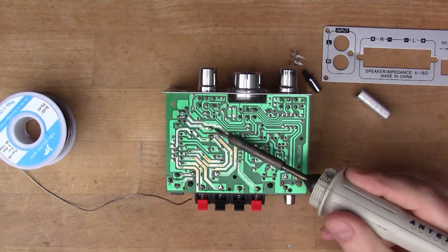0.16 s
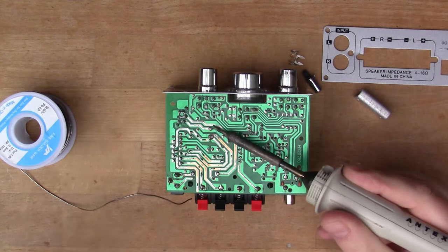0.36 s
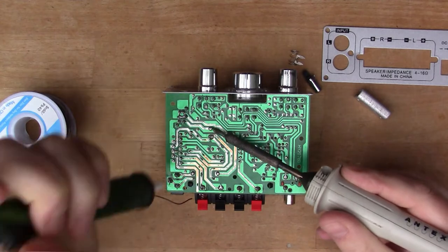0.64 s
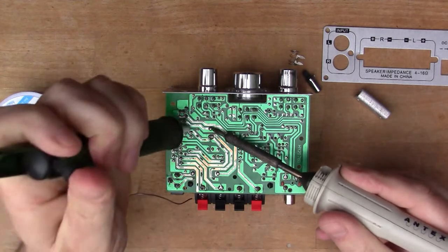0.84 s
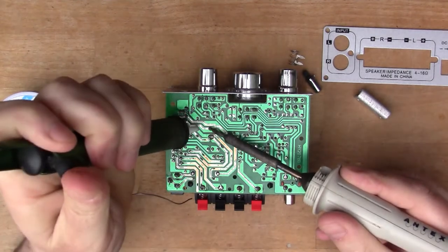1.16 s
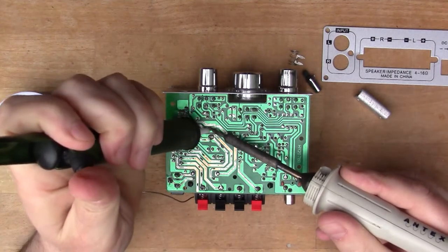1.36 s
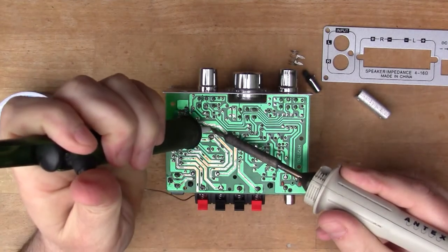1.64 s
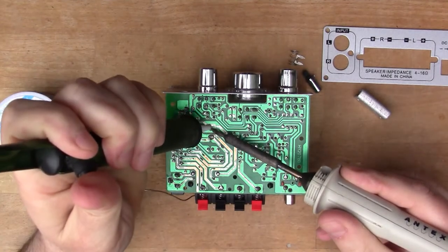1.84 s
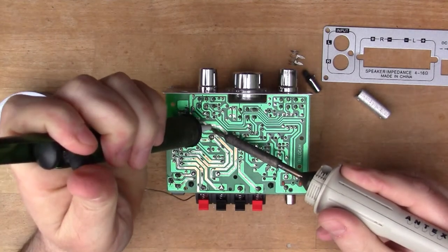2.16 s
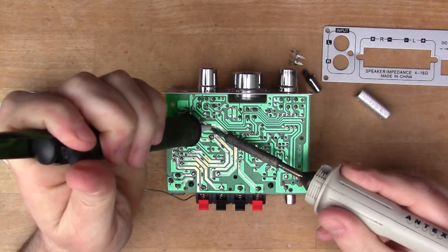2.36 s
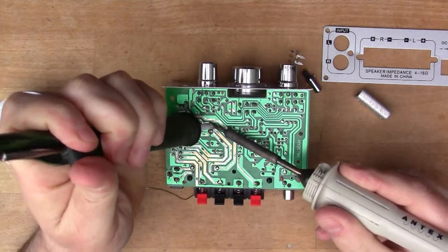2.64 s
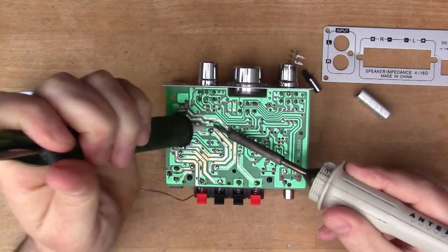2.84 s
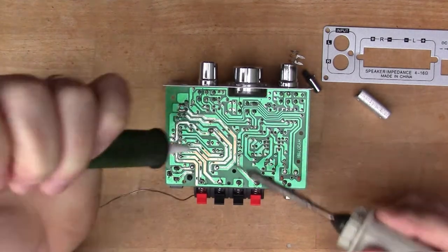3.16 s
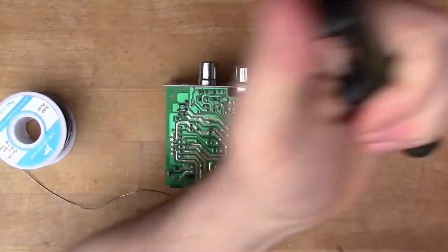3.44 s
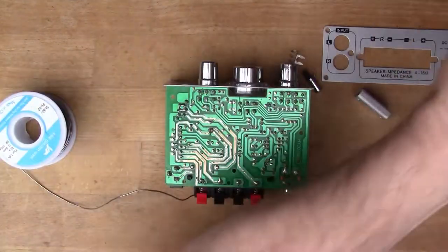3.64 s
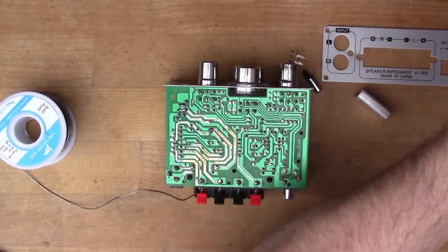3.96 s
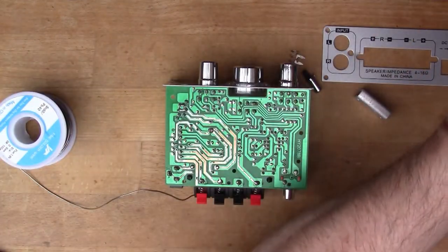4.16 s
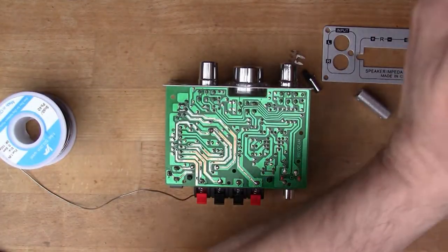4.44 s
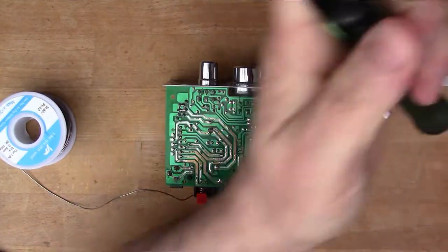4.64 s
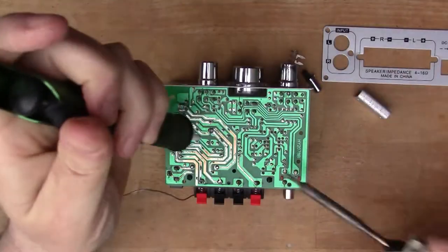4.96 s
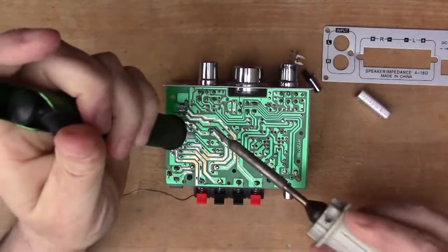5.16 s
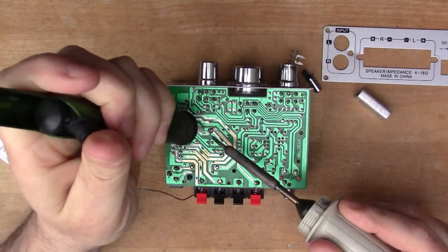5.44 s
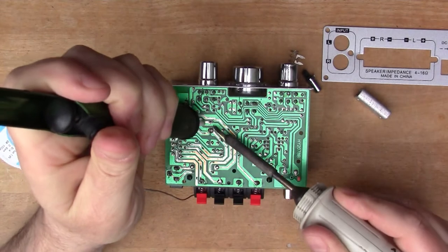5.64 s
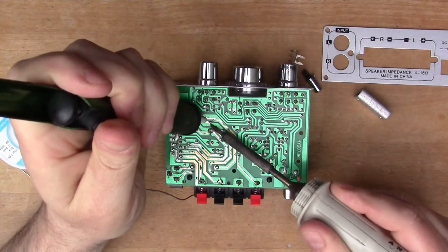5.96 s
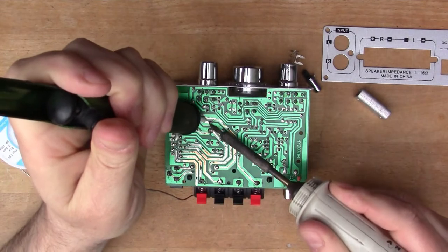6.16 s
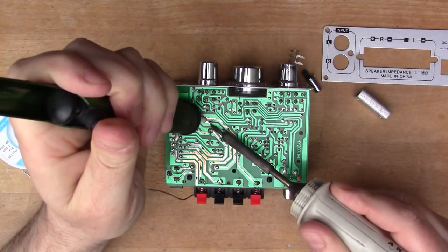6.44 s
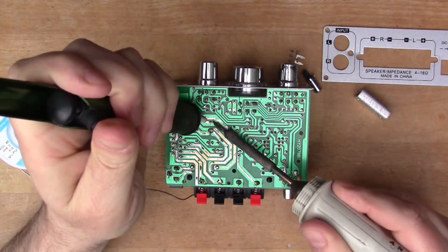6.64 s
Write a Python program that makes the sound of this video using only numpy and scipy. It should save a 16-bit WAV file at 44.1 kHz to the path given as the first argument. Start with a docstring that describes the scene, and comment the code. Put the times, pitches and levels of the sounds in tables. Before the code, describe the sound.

Close at a wooden bench in a small dry room, a plunger catch clicks sharply at once, then a soldering iron lightly taps a circuit board. A desoldering pump fires with a loud rattling snap. Hands rub, the pump is pushed down with an airy scrape and clicks locked, a hot tip briefly sizzles, the nozzle clatters softly onto the board and the iron taps again. Faint mains hum and hiss continue underneath.

```python
"""Spring-loaded desoldering pump at a wooden bench

In a small room the pump is cocked, fired once with a loud rattling snap, cocked again and set down on the
circuit board; an iron taps the board early and late. Contacts are bursts of shaped noise that excite decaying
modes; rubbing, suction and sizzling are grainy noise; the strokes add a falling whistle and rising resonances.
Under it lie a mains hum, faint whines, a low room rumble and faint hiss."""
import sys
import numpy as np
from scipy import signal
from scipy.fft import rfft, irfft
from scipy.io import wavfile
from scipy.ndimage import uniform_filter1d

SR = 44100
rng = np.random.default_rng(int(sys.argv[2]) if len(sys.argv) > 2 else 0)


def materialize(psi):
    """Save the field psi as 16-bit PCM at rate SR to the path in sys.argv[1].

    A 1-D psi becomes a single channel; in a 2-D psi each row is a channel.
    """
    bounded = np.clip(np.atleast_2d(psi).T, -1, 1)
    quanta = np.round(bounded * 32767).astype(np.int16)
    wavfile.write(sys.argv[1], SR, quanta)


N = 299880

# Every contact has a body below SPLIT_HZ and an edge above it; levels are relative within a kind of contact.
SPLIT_HZ = 2500

# spectrum of the still room: f/Hz, relative level/dB per Hz
FLOOR_SPECTRUM = [(10, 2.5), (20, 1.5), (30, -7.5), (45, -5), (65, -15.5), (85, -26), (150, -23),
                  (240, -25), (350, -31), (520, -30.5), (800, -36), (1400, -44), (3000, -54.5),
                  (9000, -57.5), (16000, -63)]
# left-right likeness of the room noise: f/Hz, likeness/(0 to 1)
LIKENESS = [(30, 0.92), (100, 0.7), (250, 0.87), (600, 0.87), (1500, 0.2), (4000, 0.05), (16000, 0.2)]
# upper lines of the mains hum and faint whines: f/Hz, level/dB
HUM_LINES = [(238, -57), (286, -60.5), (490, -63.5), (780, -67), (1464, -89.5), (1631, -100.5),
             (1997, -80.5), (9523, -78.5)]
# lowest line of the hum: t/s, relative level/dB
HUM_SWELL = [(0, -55), (1.8, -54.5), (2.25, -48), (2.9, -48.5), (3.7, -52), (6.8, -49)]
HUM_HZ = 118.8
# reverberation time of the room: f/Hz, t60/s
ROOM_T60 = [(100, 0.16), (350, 0.21), (800, 0.13), (1600, 0.26), (4000, 0.22), (8000, 0.31), (15000, 0.19)]

# soft low thumps: the hand on the bench, and at 0.083 s the first catch dropping in: t/s, body level/dB, edge
# level/dB
BUMPS = [(0.083, -32, -70), (2.845, -63, -64), (3.014, -39, -64.5), (3.835, -41, -74)]
# spectrum of a bump: f/Hz, relative level/dB per Hz
BUMP_COLOUR = [(50, -72), (100, 2.5), (200, -5.5), (450, -4.5), (800, -22.5), (2000, -29), (16000, -52)]
# hands and sleeves rub as the grip changes: start t/s, end t/s, level/dB
RUBS = [(0, 0.054, -43.5), (0.375, 0.53, -55), (0.75, 1.018, -63), (3.13, 3.636, -57.5),
        (3.648, 3.746, -53), (4.32, 4.655, -61.5), (4.845, 5.207, -55.5), (5.364, 5.4, -57.5),
        (6.64, 6.663, -55.5)]
# spectrum of the rubbing: f/Hz, relative level/dB per Hz
HANDLING_COLOUR = [(275, 3.5), (500, -23.5), (900, 7.5), (1300, -5), (2000, -6.5), (3000, -6.5),
                   (5000, -9.5), (9000, -10.5), (15300, -16.5)]
# the hot tip sizzles briefly as it is wiped: start t/s, end t/s, level before cooling/dB
SIZZLE = (4.5, 4.575, -43)
# spectrum of the sizzle: f/Hz, relative level/dB per Hz
SIZZLE_COLOUR = [(385, -28), (700, -8), (1300, -4), (2200, 1.5), (3300, -5), (5500, -1), (9500, -2.5),
                 (13000, -3.5), (15300, -6)]

# the iron taps the board: t/s, body level/dB, edge level/dB, relative ring level/dB
TAPS = [(0.385, -28, -52, -12), (0.974, -54, -60, 8), (1.382, -44.5, -58, 2), (1.765, -42, -58, -8),
        (5.890, -25, -54.5, -6.5), (6.5665, -32, -52, 9), (6.6725, -19.5, -41.5, -4)]
# spectrum of a tap: f/Hz, relative level/dB per Hz
TAP_COLOUR = [(190, -51), (350, -11), (650, -11.5), (880, -6.5), (1100, 2.5), (1350, -3.5), (1620, -3.5),
              (1950, -20), (2400, -14.5), (2800, -6), (4000, -5), (5500, -12.5), (8500, -21), (11500, -8.5),
              (15300, -25)]
# mode clusters of the tapped board: f/Hz, half width/Hz, relative level/dB, t60/s
BOARD_MODES = [(805, 21, -11.5, 0.36), (1027, 28, -4, 0.1), (1210, 16, -8, 0.07), (1485, 22, -5, 0.041),
               (1660, 19.4, -4, 0.13), (4170, 180, -29, 0.098)]
# the nozzle is set down and shifted on the board: t/s, body level/dB, edge level/dB, relative ring level/dB
NOZZLE = [(4.844, -55, -68, -6), (4.872, -49, -66, -8), (4.9105, -26.5, -29.5, 4), (4.9165, -32.5, -50, -4),
          (4.951, -45, -61, -5), (4.967, -39, -62, -4), (4.994, -49, -66, -12), (5.025, -45.5, -65, -6),
          (5.083, -35.5, -44.5, -16), (5.16, -41, -48.5, -12), (5.174, -39.5, -51, -10),
          (5.197, -41.5, -57, -6), (5.267, -46.5, -60, -11), (5.361, -48, -68, -12),
          (5.371, -53, -47.5, -13.5), (5.435, -53, -64, -9.5)]
# spectrum of a nozzle contact: f/Hz, relative level/dB per Hz
NOZZLE_COLOUR = [(137, -22), (250, -11), (480, 1.5), (700, -12.5), (1000, 0.5), (1700, -3.5), (2050, -5),
                 (2450, -5), (3200, 3), (4500, 2.5), (7000, 0), (10800, 3), (13000, -5), (15300, -13)]
# mode clusters of the board under the nozzle: f/Hz, half width/Hz, relative level/dB, t60/s
SEAT_MODES = [(495, 19, -16, 0.1), (1180, 70, -16, 0.08), (1680, 97, -8, 0.05), (2420, 190, 1.5, 0.031),
              (2490, 410, -16, 0.089)]

# light ticks of the pump in the hand, and at 4.564 s a crackling pop of the sizzle: t/s, body level/dB, edge
# level/dB
TICKS = [(2.8934, -39.5, -43), (3.4235, -37, -59), (3.6536, -35.5, -50), (4.3236, -39.5, -71),
         (4.564, -33.5, -66), (4.6297, -44, -76)]
# spectrum of a tick: f/Hz, relative level/dB per Hz
TICK_COLOUR = [(400, -9), (900, -4), (2000, -6), (3200, 2), (4400, 10), (6000, 1.5), (8000, -5),
               (11000, -11), (16000, -26)]
# the plunger rod knocks in the barrel: t/s, body level/dB, edge level/dB, relative ring level/dB
ROD = [(0.2385, -25.5, -25, -4.5), (4.029, -24.5, -46, -5.5), (4.2153, -25, -24.5, -0.5)]
# spectrum of a rod knock: f/Hz, relative level/dB per Hz
ROD_COLOUR = [(165, -11.5), (300, -12.5), (500, -16.5), (700, -7.5), (950, -11), (1350, -15), (1800, -20),
              (2700, -9.5), (3700, -2.5), (5600, -8.5), (8000, -6), (10000, -4), (13000, -10),
              (15300, -20.5)]
# mode clusters of the barrel: f/Hz, half width/Hz, relative level/dB, t60/s
BARREL_MODES = [(700, 13, -0.5, 0.025), (772, 77, -23, 0.062), (1670, 40, -14, 0.033),
                (2073, 27, -11.5, 0.02), (3800, 220, -10, 0.038)]

# the plunger is pushed home and the catch drops in:
# catch t/s, body level/dB, edge level/dB, most shaken spring region f/Hz, push level/dB
COCKINGS = [(0.083, -17.5, -14, 4870, -59), (4.0507, -15, -11, 3560, -44.5)]
# spectrum of the sliding seal and of the suction: f/Hz, relative level/dB per Hz
SEAL_COLOUR = [(154, 2.5), (280, -17), (600, -6), (1000, 7), (1700, 7), (2600, 0), (3700, 3.5), (5500, 1),
               (7500, 0.5), (9300, 2), (11000, -1), (13000, -5.5), (15300, -17)]
# resonances of the shrinking air chamber: multiple of the air resonance, half width/Hz, relative level/dB
CHAMBER = [(0.075, 200, -5.5), (.17, 350, -6.5), (0.521, 330, -9), (0.999, 1400, 3)]
# squeak of the seal in the first stroke: start t/s, end t/s, f/Hz
SQUEAK = (0.013, 0.026, 1340)
# spectrum of the catch: f/Hz, relative level/dB per Hz
LATCH_COLOUR = [(82, -38.5), (150, -7.5), (450, -26), (720, -8), (1350, -20), (2100, -19.5), (3050, -5),
                (3650, -16), (4400, -9), (5500, 9), (8500, -1), (10500, 6.5), (12200, -2.5), (15300, 0)]
# mode clusters of the spring: f/Hz, half width/Hz, relative level/dB, t60/s
SPRING_MODES = [(2580, 510, -16.5, 0.11), (3600, 200, -20, 0.053), (3690, 330, -17, 0.092),
                (4400, 490, -19, 0.12), (5140, 210, -17.5, 0.066), (6500, 1300, -18, 0.096),
                (8430, 1100, -17, 0.13), (10700, 630, -24, 0.18)]

# the freed piston knocks, hits its stop and rebounds: t/s, body level/dB, edge level/dB
PISTON = [(2.6238, -8.5, -15), (2.6295, -12.5, -18.5), (2.6355, -9.5, -6.5), (2.645, -18, -18),
          (2.652, -8, -14.5), (2.661, -8, -15), (2.672, -9, -15), (2.678, -15, -19), (2.687, -20, -22),
          (2.6995, -16, -27), (2.709, -21, -28), (2.721, -26, -32)]
# spectrum of the snap: f/Hz, relative level/dB per Hz
SNAP_COLOUR = [(41, -5.5), (75, -18.5), (110, -15.5), (160, -5), (240, -9), (310, -1), (390, -6.5),
               (560, -3), (820, -1), (1150, -2), (1700, -1.5), (3000, -6), (4300, -8.5), (5600, -6.5),
               (7200, -13.5), (11000, -12.5), (15300, -22)]
# mode clusters of the struck stop: f/Hz, half width/Hz, relative level/dB, t60/s
STOP_MODES = [(113.5, 9, -16.5, 0.17), (229, 12, -9.5, 0.099), (414, 8.5, -18, .12), (476, 14, -15.5, 0.11),
              (750, 4.1, -13, 0.1), (812, 10, -9.5, 0.097), (954, 11, -17, 0.11), (1312, 34, -18.5, 0.12),
              (1442, 10, -17.5, 0.075), (1670, 6.8, -14.5, 0.1), (2056, 25, -15, 0.11),
              (2498, 53, -19, 0.075), (5600, 220, -11.5, 0.13)]

# the stroke starts STROKE_S before the catch; its sound starts to ease off EASE_S before it
STROKE_S, EASE_S = 0.215, 0.043
# over one stroke the whistle falls and the air resonance rises fast, then levels off
WHISTLE_HZ, WHISTLE_FALL_HZ, AIR_HZ, AIR_RISE_HZ = 4220, 1390, 7760, 2700
# shares of the stroke: span of the rise, strongest point of the air, centre and span of the whistle
AIR_RISE_SPAN, AIR_AT, WHISTLE_AT, WHISTLE_SPAN = 0.16, 0.14, 0.38, 0.26
# level changes: seal over the stroke; air resonance per stroke away from AIR_AT; chamber over the stroke
SEAL_SAG_DB, AIR_SAG_DB, CHAMBER_GROWTH_DB = 3.5, 36.5, 4


def from_db(db):
    """Level definition: convert decibels to an amplitude ratio."""
    return 10 ** (np.asarray(db) / 20)


def rms_one(x):
    """Normalisation: scale to unit rms amplitude."""
    return x / np.sqrt(np.mean(x ** 2) + 1e-20)


def at_hz(points, hz):
    """Interpolation of a spectrum along a logarithmic frequency axis."""
    f, value = np.transpose(points)
    return np.interp(np.log(np.maximum(hz, 1)), np.log(f), value)


def butter(x, hz, kind, order=2):
    """Causal filtering with a Butterworth response."""
    return signal.sosfilt(signal.butter(order, hz, kind, fs=SR, output="sos"), x)


def convolve(x, response):
    """Linear superposition: convolve a signal with an impulse response."""
    return signal.fftconvolve(np.atleast_2d(x), np.atleast_2d(response), axes=-1)[:, :N]


def balance(x, left_db):
    """Interchannel level difference: raise left against right by left_db."""
    return x * from_db([[left_db / 2], [-left_db / 2]])


def impulse(colour, size=4096):
    """Minimum phase: fold the cepstrum of a spectrum into a causal response of unit energy."""
    cepstrum = irfft(np.log(from_db(at_hz(colour, np.fft.rfftfreq(size, 1 / SR)))))
    cepstrum[1:size // 2] *= 2
    cepstrum[size // 2 + 1:] = 0
    response = irfft(np.exp(rfft(cepstrum)))
    return response / np.linalg.norm(response)


def at_ports(alike, size=N, bass_hz=1100):
    """Spatial coherence: stereo noise nearly common at long waves, its shared part reaching the left first."""
    hz = np.fft.rfftfreq(size, 1 / SR)
    apart = (1 - np.clip(alike, 0, 1)) * (.03 + .97 * hz ** 2 / (hz ** 2 + bass_hz ** 2))
    shared, own = rng.standard_normal(size), rng.standard_normal((2, size))
    delayed = np.roll(shared, 6)   # samples
    spectrum = np.sqrt(1 - apart) * rfft([shared, delayed]) + np.sqrt(apart) * rfft(own)
    return irfft(spectrum, size)


def bell(f, hz, width_hz):
    """Resonance curve of Gaussian form."""
    return np.exp(-.5 * ((f - hz) / width_hz) ** 2)


def narrow_noise(hz, width_hz, size=N):
    """Band-limited randomness: noise under a Gaussian resonance curve, unit rms."""
    spectrum = rfft(rng.standard_normal(size)) * bell(np.fft.rfftfreq(size, 1 / SR), hz, width_hz)
    return rms_one(irfft(spectrum, size))


def hum_line(hz, waver, width_hz):
    """Modulation by narrow-band noise: a tone wavering in level and phase, unit rms."""
    tone = np.sin(2 * np.pi * hz * np.arange(N) / SR)
    return rms_one(tone + waver * narrow_noise(hz, width_hz))


def glide(hz, width_hz):
    """Frequency modulation: stereo noise in a resonance that follows a pitch curve."""
    carrier = np.sin(2 * np.pi * np.cumsum(hz) / SR)
    return np.array([rms_one(narrow_noise(0, width_hz) * carrier) for port in range(2)])


def swell(start, end, db, attack_s, release_s):
    """Exponential growth and decay: level held from start to end; attack and release each span 20 dB."""
    t = np.arange(N) / SR
    away = np.maximum(start - t, 0) / attack_s + np.maximum(t - end, 0) / release_s
    return db - 20 * np.minimum(away, 10)


def shaped(noise, envelope):
    """Energy equivalence: noise under an envelope, carrying exactly the envelope's energy."""
    return rms_one(noise * envelope) * np.sqrt(np.mean(envelope ** 2))


def patchy(x, patchy_db, size=256):
    """Random spectral modulation: each region of the spectrum flares and fades on its own."""
    spectra = signal.stft(x, nperseg=size)[2]
    chance = rng.standard_normal(spectra.shape[1:])
    patch_bins = max(1, round(594.6 * size / SR))         # 594.6 Hz wide
    patch_frames = max(1, round(0.014 * SR * 2 / size))   # 14 ms long
    chance = uniform_filter1d(chance, patch_bins, axis=0)
    chance = uniform_filter1d(chance, patch_frames, axis=1)
    flare = rms_one(from_db(patchy_db * rms_one(chance)))
    return signal.istft(spectra * flare)[1][:, :N]


def rub(level_db, colour, grain_db, patchy_db, left_db):
    """Stick-slip friction or turbulence: coloured noise broken into uneven grains."""
    grain = rms_one(from_db(grain_db * narrow_noise(0, 83)))
    noise = patchy(convolve(grain * at_ports(0.18), impulse(colour)), patchy_db)
    return balance(from_db(level_db) * noise, left_db)


def blows(rows, colour, modes, contact_s, low_db, high_db, ring_db, alike, left_db, rise_s, chatter_db=0):
    """Impact excitation: each blow is a dying rattle of contacts with decaying clusters of modes."""
    t = np.arange(SR // 2) / SR
    size = len(t)
    freqs, response = np.fft.rfftfreq(size, 1 / SR), impulse(colour)
    halves = [butter(response, SPLIT_HZ, kind, order=5) for kind in ("low", "high")]
    halves = [half / np.linalg.norm(half) for half in halves]
    attack = 1 - np.exp(-(t / rise_s) ** 2)   # the contact takes a moment to close
    out = np.zeros((2, N + SR))
    for s, body_db, edge_db, *own_ring_db in rows:
        crackle = from_db(0.5 * narrow_noise(0, 258, size))   # uneven contact, 0.5 dB rms
        rattle = shaped(crackle * at_ports(alike, size), attack * np.exp(-t / contact_s))
        gains = from_db([body_db + low_db, edge_db + high_db])
        contact_response = sum(gain * half for gain, half in zip(gains, halves))
        blow = convolve(rattle, contact_response)[:, :size]
        chatter = from_db(chatter_db * narrow_noise(0, 140, size))
        drive = rfft(at_ports(alike, size))
        for hz, width_hz, db, t60 in modes:
            cluster = irfft(drive * bell(freqs, hz, width_hz), size)
            decay = attack * np.exp(-np.log(1000) * t / t60)
            struck_db = body_db if hz < SPLIT_HZ else edge_db
            strength = from_db(struck_db + db + ring_db + sum(own_ring_db))
            blow += strength * shaped(cluster * chatter, decay)
        first = round(s * SR)
        out[:, first:first + size] += blow
    return balance(out[:, :N], left_db)


def background():
    """Partial coherence: room noise from mid and side parts, a wavering hum and an infrasonic sway."""
    hz = np.fft.rfftfreq(N, 1 / SR)
    alike = np.clip(at_hz(LIKENESS, hz), 0, 1)
    mid, side = rfft(rng.standard_normal((2, N))) * from_db(at_hz(FLOOR_SPECTRUM, hz)) * (hz > 10)
    air = rms_one(irfft(np.sqrt(1 + alike) * mid + np.sqrt(1 - alike) * side * [[1], [-1]], N))
    swell_t, swell_db = np.transpose(HUM_SWELL)
    hum_db = 1.5 + np.interp(np.arange(N) / SR, swell_t, swell_db)
    hum = from_db(hum_db) * hum_line(HUM_HZ, waver=0.41, width_hz=10.0)
    hum = hum + sum(from_db(db) * hum_line(f, waver=2.0, width_hz=14.8) for f, db in HUM_LINES)
    sway = from_db(-25.0) * narrow_noise(3.65, 1.89)   # slow pressure sway below hearing
    return balance(from_db(-37.0) * air + hum, left_db=2.0) + balance(sway, left_db=-2.0)


def room(x, build_s=0.0013):
    """Reverberation: diffuse reflections build up within milliseconds and decay band by band."""
    t, tail = np.arange(SR * 3 // 5) / SR, 0
    edges = np.geomspace(60, 17000, 9)
    for low, high in zip(edges, edges[1:]):
        band = butter(at_ports(0, len(t)), [low, high], "band")
        t60 = at_hz(ROOM_T60, np.sqrt(low * high))
        tail = tail + band * np.exp(-np.log(1000) * t / t60)
    tail = tail * (1 - np.exp(-t / build_s))
    return convolve(x, tail / np.linalg.norm(tail, axis=1, keepdims=True))


def bumps():
    """Soft impact: a long, soft contact gives mostly low frequencies."""
    return blows(BUMPS, BUMP_COLOUR, [], contact_s=0.036, low_db=-1.0, high_db=1, ring_db=0,
                 alike=0.48, left_db=0.5, rise_s=0.00077)


def hands():
    """Sliding friction: hands and sleeves rub; the strongest rub sets the level at each moment."""
    level_db = np.max([swell(*row, attack_s=0.17, release_s=0.22) for row in RUBS], axis=0)
    return rub(level_db, HANDLING_COLOUR, grain_db=2.0, patchy_db=2.0, left_db=1.5)


def sizzle():
    """Boiling noise: the sizzle fades at a steady rate in decibels as the tip cools."""
    cooling_db = 46 * np.maximum(np.arange(N) / SR - SIZZLE[0], 0)   # 46 dB per second
    level_db = swell(*SIZZLE, attack_s=0.018, release_s=0.07) - cooling_db
    return rub(level_db, SIZZLE_COLOUR, grain_db=1.0, patchy_db=0.5, left_db=3.5)


def taps():
    """Modal excitation: the iron's taps set the board ringing."""
    return blows(TAPS, TAP_COLOUR, BOARD_MODES, contact_s=0.0079, low_db=-5.5, high_db=6, ring_db=-11.5,
                 alike=0.69, left_db=2.5, rise_s=0.00073)


def nozzle():
    """Modal excitation: the nozzle set down and shifted rings the board beneath it."""
    return blows(NOZZLE, NOZZLE_COLOUR, SEAT_MODES, contact_s=0.0069, low_db=0.0, high_db=2.5, ring_db=-1,
                 alike=0.26, left_db=1.5, rise_s=0.00081)


def ticks():
    """Light impact: short clicks without ringing modes, from the pump in the hand and one pop of the sizzle."""
    return blows(TICKS, TICK_COLOUR, [], contact_s=0.0047, low_db=-2.5, high_db=10.0, ring_db=0,
                 alike=0.52, left_db=2.0, rise_s=0.001)


def rod():
    """Modal excitation: the plunger rod's knocks ring the barrel."""
    return blows(ROD, ROD_COLOUR, BARREL_MODES, contact_s=0.005, low_db=-1.0, high_db=3.0, ring_db=7.0,
                 alike=0.67, left_db=2.0, rise_s=0.0016)


def squeak():
    """Stick-slip oscillation: a short, slightly wavering squeak of the seal, with a rough octave."""
    start, end, hz = SQUEAK
    fundamental = hum_line(hz, waver=0.406, width_hz=89)
    octave = from_db(-8) * glide(np.full(N, 2 * hz), width_hz=210)
    level_db = swell(start, end, -49, attack_s=0.045, release_s=0.028)
    return from_db(level_db) * (fundamental + octave)


def chamber_air(travel, level_db):
    """Cavity resonance: modes of the shrinking air chamber rise together; higher ones sag more."""
    air_hz = AIR_HZ + AIR_RISE_HZ * (1 - np.exp(-travel / AIR_RISE_SPAN))
    sag_db = AIR_SAG_DB * np.abs(travel - AIR_AT)
    air = 0
    for ratio, width_hz, db in CHAMBER:
        mode_db = level_db + db + CHAMBER_GROWTH_DB * travel - ratio * sag_db
        air = air + from_db(mode_db) * glide(ratio * air_hz, width_hz)
    return air


def leak_whistle(travel, level_db):
    """Jet tone: air squeezed past the seal whistles downward, breaking up as the seal catches and slips."""
    squeeze = np.exp(-((travel - WHISTLE_AT) / WHISTLE_SPAN) ** 2)
    breaks = rms_one(from_db(5 * np.tanh(narrow_noise(0, 60))))
    tone = glide(WHISTLE_HZ - WHISTLE_FALL_HZ * travel, width_hz=120)
    return from_db(level_db - 4.5) * squeeze * breaks * tone


def push(catch_s, push_db):
    """Friction and compression: the seal rubs down the barrel and squeezes the air against the spring."""
    start = catch_s - STROKE_S
    travel = np.clip((np.arange(N) / SR - start) / STROKE_S, 0, 1)
    level_db = swell(start, catch_s - EASE_S, push_db, attack_s=0.054, release_s=0.093)
    air = chamber_air(travel, level_db)
    whistle = leak_whistle(travel, level_db)
    seal_db = level_db + 1.0 - SEAL_SAG_DB * travel   # the spring slows the piston
    seal = rub(seal_db, SEAL_COLOUR, grain_db=2.2, patchy_db=1.8, left_db=3.5)
    return seal + patchy(air, patchy_db=2.0) + whistle


def latch(favour_db=8, favour_octaves=0.36):
    """Selective modal excitation: the catch drops in, bounces once and shakes the chattering spring coils."""
    bounce_s, bounce_db = 0.0063, -6.5   # the body loses twice this level
    out = 0
    for s, body_db, edge_db, centre_hz, _ in COCKINGS:
        modes = []
        for hz, width_hz, db, t60 in SPRING_MODES:
            favour = np.exp(-(np.log2(hz / centre_hz) / favour_octaves) ** 2)
            modes.append((hz, width_hz, db + favour_db * favour, t60))
        rows = [(s, body_db, edge_db), (s + bounce_s, body_db + 2 * bounce_db, edge_db + bounce_db)]
        out = out + blows(rows, LATCH_COLOUR, modes, contact_s=0.0034, low_db=1.0, high_db=5.0, ring_db=-0.5,
                          alike=0.28, left_db=0.5, rise_s=0.0024, chatter_db=-2.5)
    return out


def suction():
    """Turbulent inflow: air is sucked in as the piston flies towards the stop."""
    first_knock_s = PISTON[0][0]
    level_db = swell(first_knock_s - 0.015, first_knock_s, -33.5, attack_s=0.0095, release_s=0.019)
    return rub(level_db, SEAL_COLOUR, grain_db=-2.0, patchy_db=4.5, left_db=3.0)


def snap():
    """Repeated impact: the freed piston knocks, hits its stop and rebounds, exciting the stop's modes."""
    return blows(PISTON, SNAP_COLOUR, STOP_MODES, contact_s=0.012, low_db=-5.0, high_db=-0.5, ring_db=-4.0,
                 alike=0.14, left_db=0.5, rise_s=0.00035)


def scene():
    """Superposition of pump, board, hands and background, with reflections of the hard contacts."""
    piston = snap()
    plunger = rod()
    board = nozzle() + taps()
    light_ticks = ticks()
    soft_bumps = bumps()
    pushes = sum(push(s, push_db) for s, *_, push_db in COCKINGS)
    pump = latch() + plunger + light_ticks
    echoes = room(from_db(-10) * piston + from_db(-8.5) * pump + from_db(-11.0) * board)
    contacts = piston + pump + board + soft_bumps + echoes
    seal_sounds = pushes + squeak()
    friction = suction() + sizzle() + hands()
    return contacts + seal_sounds + friction + background()


def record(dry):
    """Saturation and band limiting: the loudest peaks are rounded and the top is cut above 16 kHz."""
    rounded = 1.1 * np.tanh(dry / 1.1)
    return signal.sosfilt(signal.ellip(10, .2, 80, 16000, fs=SR, output="sos"), rounded)


dry = scene()
out = record(dry)
materialize(out)
```